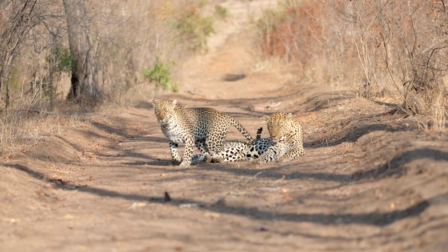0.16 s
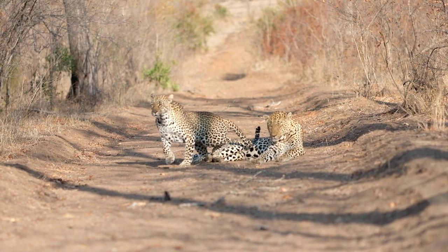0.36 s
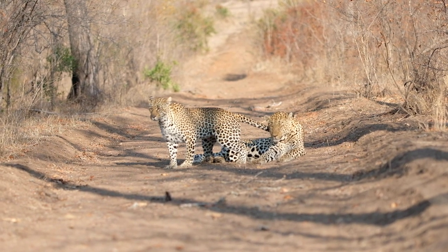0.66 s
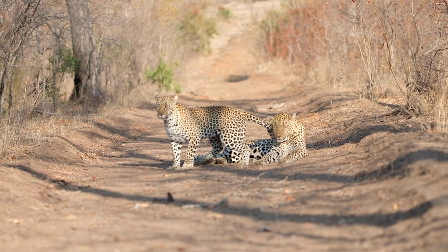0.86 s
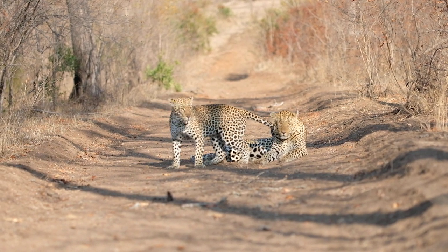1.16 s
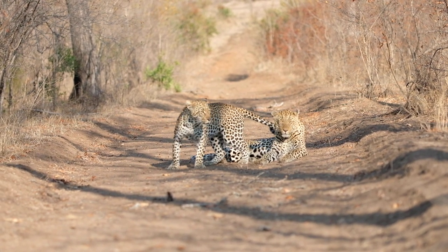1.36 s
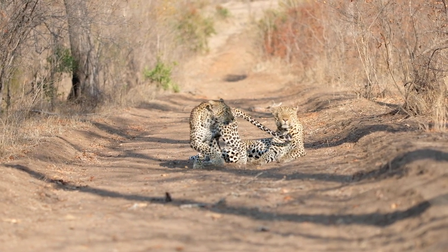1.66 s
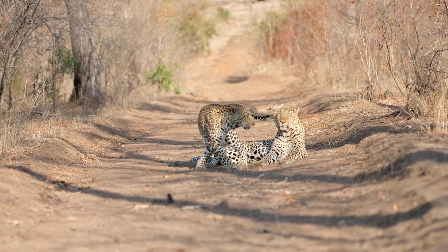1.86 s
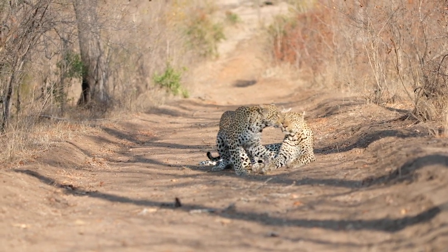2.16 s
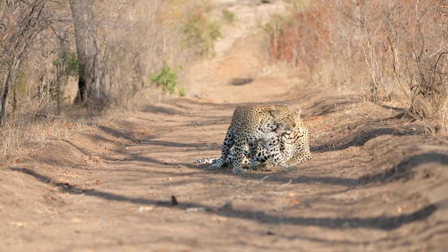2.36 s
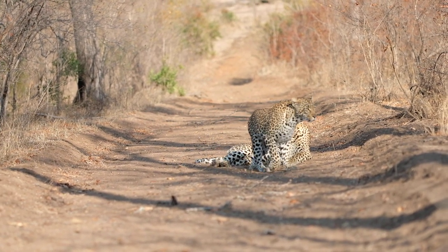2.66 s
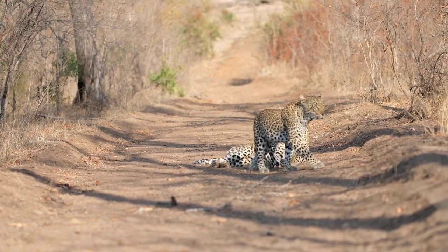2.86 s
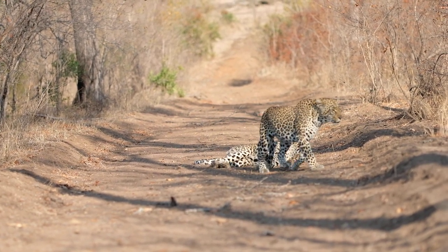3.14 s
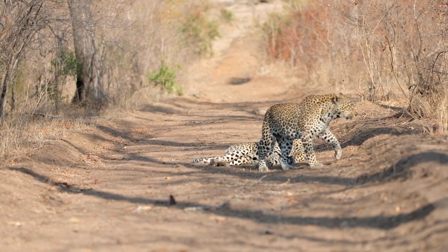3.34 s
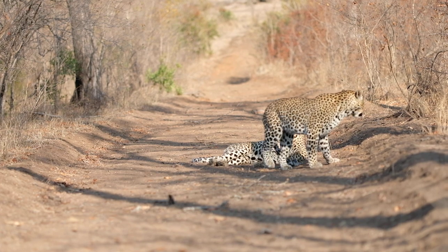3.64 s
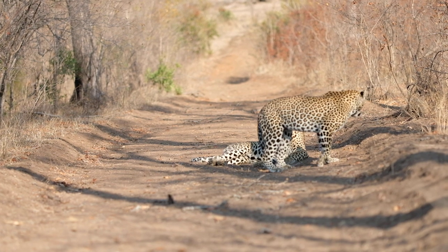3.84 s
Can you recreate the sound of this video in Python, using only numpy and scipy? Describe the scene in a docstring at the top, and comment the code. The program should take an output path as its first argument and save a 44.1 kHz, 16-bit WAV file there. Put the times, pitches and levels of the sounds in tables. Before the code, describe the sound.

Low pulsing leopard growl, a short grunt, then softer growling, with camera shutter bursts and wind

```python
"""A dirt track in dry bush: a leopard growls low in separate throat claps, grunts once, then growls softer.
Each clap is a push of air that rings the chest and throat and rasps in the mouth.
A camera beside the microphone fires two bursts of short rattles, and something hollow is knocked.
A far bird whistles faintly in gliding tones. Wind, made of shaped noise and short swings,
buffets the two microphone ports separately over a quiet hiss of open air."""
import sys
import numpy as np
from scipy import signal
from scipy.fft import rfft, irfft
from scipy.io import wavfile

SR = 44100
rng = np.random.default_rng(int(sys.argv[2]) if len(sys.argv) > 2 else 0)


def bounce(signal):
    """Save signal as a 16-bit WAV file at the path given by the first command-line argument."""
    frames = np.transpose(np.atleast_2d(signal))
    limited = np.clip(frames, -1, 1)
    pcm = np.round(limited * 32767).astype(np.int16)
    wavfile.write(sys.argv[1], SR, pcm)


N = 176400   # 4 s


def amp(db):
    """Turn decibels into a gain."""
    return 10 ** (np.asarray(db) / 20)


def unit(x):
    """Scale to an average strength (rms) of 1."""
    return x / np.sqrt(np.mean(x ** 2) + 1e-20)


def at_hz(points, hz):
    """Read a (frequency, value) table, spacing frequencies by ratio as the ear does."""
    f, v = np.transpose(points)
    return np.interp(np.log(hz + 1), np.log(f), v)


def coloured(points, channels):
    """Noise whose strength at each frequency follows a table, scaled to rms 1."""
    hz = np.arange(N // 2 + 1) * SR / N
    spectrum = rfft(rng.standard_normal((channels, N)))
    return unit(irfft(spectrum * amp(at_hz(points, hz)), N))


def drift(rate):
    """Slow random wandering with a spread of 1, from noise smoothed twice."""
    r = np.exp(-2 * np.pi * rate / SR)
    return unit(signal.lfilter([1], [1, -2 * r, r * r], rng.standard_normal(N + SR))[SR:])


def ring(x, hz, t60):
    """A struck body: a unit click starts a sine of height 1 that falls 60 dB in t60 seconds."""
    r, w = amp(-60 / (t60 * SR)), 2 * np.pi * hz / SR
    return signal.lfilter([0, np.sin(w)], [1, -2 * r * np.cos(w), r * r], x + 1e-18)


def resonance(x, hz, width_hz):
    """A hollow that favours one band of frequencies, with gain 1 at its peak."""
    r = np.exp(-np.pi * width_hz / SR)
    feedback = [1, -2 * r * np.cos(2 * np.pi * hz / SR), r * r]
    return signal.lfilter([(1 - r * r) / 2, 0, (r * r - 1) / 2], feedback, x + 1e-18)


def add(out, s, sound):
    """Mix a sound in at a time in seconds."""
    i = int(s * SR)
    part = sound[max(-i, 0):N - i]
    out[max(i, 0):max(i, 0) + len(part)] += part


# Chosen claps of each call: (time [s], level [dB], open-mouth rasp relative to the clap [dB]).
# The clap numbers count every clap; those between the chosen ones are evenly spaced.
GROWL = [(0.025, -27, -38), (0.122, -23.5, -42.5), (0.207, -24.5, -25), (0.29, -19.5, -34),
         (0.326, -21, -30), (0.364, -19, -32), (0.405, -23, -36.5), (0.501, -24, -36), (0.557, -21.5, -43),
         (0.646, -21, -47), (0.847, -25, -33), (0.984, -21.5, -41), (1.079, -21, -41), (1.185, -24.5, -42),
         (1.296, -29, -49)]
GROWL_CLAP_NUMBER = [0, 2, 4, 6, 7, 8, 9, 11, 12, 14, 18, 21, 23, 25, 27]
GRUNT = [(1.543, -39, -46), (1.557, -28.5, -25.5), (1.5812, -24, -28)]
GRUNT_CLAP_NUMBER = [0, 1, 2]
LOW_GROWL = [(1.946, -32.5, -43), (2.005, -40, -42), (2.062, -30.5, -60), (2.116, -38, -50),
             (2.167, -36.5, -41), (2.204, -33, -35), (2.265, -32.5, -58), (2.324, -30.5, -33.5),
             (2.383, -39, -44), (2.585, -32, -61), (2.687, -28.5, -61), (2.802, -36, -28)]
LOW_GROWL_CLAP_NUMBER = [0, 1, 2, 3, 4, 5, 6, 7, 8, 12, 14, 16]
# Chest in each call: (pitch [Hz], time to fall 60 dB [s], extra throat level [dB])
GROWL_CHEST, GRUNT_CHEST, LOW_GROWL_CHEST = (205, 0.053, 0), (216.5, 0.051, 0), (187, 0.076, -1.2)
# Ringing of the throat: (frequency [Hz], relative level [dB], time to fall 60 dB [s])
THROAT = [(257, -10.5, 0.052), (344, -14.5, 0.076)]
# Ringing of the mouth: (frequency [Hz], relative level [dB], time to fall 60 dB [s])
MOUTH = [(1600, -3, 0.024), (1963, 0.5, 0.04), (2260, 0, 0.03), (2730, -10, 0.034), (3300, -11, 0.022)]
CLAP_S, RASP_S, BREATH_S = 0.0034, 0.0059, 0.05   # push length; fading times of rasp and breath
BREATH_DB, CHEST_WIDTH_HZ = -70, 570
CHEST_SPREAD, MOUTH_SPREAD = .012, .025   # chance in pitch from clap to clap, as a fraction
CLAP_SPREAD_DB = 1.5
HOLD_DB = 26.5   # added to the rasp level to set the later pushes, up to full strength


def growl(rows, numbers, chest):
    """Each clap of the vocal folds is a soft push that rings chest and throat and rasps in the mouth."""
    s, level_db, rasp_db = np.transpose(rows)
    chest_hz, chest_t60, throat_db = chest
    out = np.zeros(N)
    t = np.arange(SR // 8) / SR
    push = np.hanning(max(int(CLAP_S * SR), 3)) / (CLAP_S * SR / 2)
    push = np.pad(push, (0, len(t) - len(push)))
    for k in range(numbers[-1] + 1):
        hz = chest_hz * (1 + CHEST_SPREAD * rng.standard_normal())
        puff = rng.standard_normal(len(t))
        open_db = np.interp(k, numbers, rasp_db)
        # with the mouth open the folds push again one and two chest cycles later
        again = np.roll(push, int(SR / hz)) + np.roll(push, int(2 * SR / hz))
        hold = min(amp(HOLD_DB + open_db), 1) * again
        throat_drive = push + amp(BREATH_DB) * puff * np.exp(-t / BREATH_S)
        body = resonance(ring(throat_drive + hold, hz, chest_t60), chest_hz, CHEST_WIDTH_HZ)
        for f, db, t60 in THROAT:
            body = body + amp(throat_db + db) * ring(throat_drive, f, t60)
        rasp = np.zeros(len(t))
        for f, db, t60 in MOUTH:
            mouth_hz = f * (1 + MOUTH_SPREAD * rng.standard_normal())
            rasp += amp(db - 23) * ring(puff * np.exp(-t / RASP_S), mouth_hz, t60)
        gain = amp(np.interp(k, numbers, level_db) + CLAP_SPREAD_DB * rng.standard_normal())
        add(out, np.interp(k, numbers, s), -gain * (body + amp(open_db) * rasp))
    return out


# Camera bursts: (time of the first clack [s], number of frames)
BURSTS = [(.8648, 3), (1.7865, 4)]
# Moving parts touching: (time into the frame [s], relative level [dB], relative treble level [dB],
# mirror box level against the first [dB], rise [s], fall [s]); the first row only opens a burst
CONTACTS = [(0, -40, -6.5, 2.5, 0.0015, 0.0048), (0.028, -45.5, -3.5, -2, 0.0069, 0.0091),
            (0.0498, -45, -4, 4, 0.0014, 0.0054), (0.0719, -37, 1, 3.5, .0008, .004),
            (0.0869, -37, 1, -2.5, 0.00411, 0.0042)]
# Camera body: (frequency [Hz], half width [Hz], relative level [dB])
CAMERA = [(1000, 43, -5.5), (1815, 80, 6.5), (2000, 170, 0.5), (3630, 104, -8), (5580, 570, -19.5),
          (7400, 290, -17.5)]
# Mirror box: (frequency [Hz], half width [Hz], relative level [dB])
MIRROR = [(826, 77, 2), (1418, 55, 2), (2170, 236, -4.5), (2810, 87, -11.5)]
# The mirror hitting its stop: (frequency [Hz], relative level [dB], rise and fall [s])
THUD = [(395, -5, 0.0021), (1005, -7.5, 0.0044), (1797, 5.5, 0.0017)]
THUD_CONTACTS = (0, 4)   # rows of CONTACTS that thud
FRAME_S, LAST_EARLY_S = .0895, .0045   # the last contact of a burst comes early
BOUNCE_S, BOUNCE_DB = 0.0077, -14.5   # every contact touches again
MOTOR_TICKS_PER_S = 1600
MOTOR_BODY_DB, MOTOR_BOX_DB, MOTOR_TREBLE_DB = -62, -58.5, -58
CAMERA_PAN_DB, CAMERA_LAG_S = 2.5, 0.000095   # left is louder, right is later
CAMERA_TREBLE_HZ, CAMERA_HISS_DB = 3000, -13
TREBLE_ALIKE = 0.12   # left-right likeness, 0 to 1
CAMERA_ECHO_DB, CAMERA_ECHO_S = -11, 0.0098


def camera_resonances(x_of_hz, table, gain_db):
    """Parts of a casing resonate side by side, every second one pushing the opposite way."""
    total = 0
    for k, (hz, half_width, db) in enumerate(table):
        total = total + (-1) ** k * amp(db + gain_db) * resonance(x_of_hz(hz), hz, 2 * half_width)
    return total


def camera():
    """Mirror and shutter contacts rattle the body briefly; a motor ticks throughout each burst."""
    drive, box, bright, thud = np.zeros((4, N))
    t = np.arange(SR // 20) / SR
    stop = sum(amp(db + 8) * t / d * np.exp(-t / d) * np.sin(2 * np.pi * hz * t) for hz, db, d in THUD)
    for start, frames in BURSTS:
        hits = [(start, 0)]
        for frame in range(frames):
            hits += [(start + frame * FRAME_S, row) for row in range(1, len(CONTACTS))]
        for k, (frame_start, row) in enumerate(hits):
            offset, db, treble_db, box_db, rise, fall = CONTACTS[row]
            s = frame_start + offset - LAST_EARLY_S * (k == len(hits) - 1)
            shape = amp(db) * np.minimum(t / rise, np.exp((rise - t) / fall))
            shape = shape + amp(BOUNCE_DB) * np.roll(shape, int(BOUNCE_S * SR))
            # random signs turn each smooth shape into a rattle
            add(drive, s, shape * rng.choice([-1, 1], len(t)))
            add(box, s, amp(box_db) * shape * rng.choice([-1, 1], len(t)))
            add(bright, s, shape ** 2 / amp(db) * amp(treble_db))
            if row in THUD_CONTACTS:
                add(thud, s + rise / 2, amp(db) * stop)
        size = int(frames * FRAME_S * SR)
        ticks = (rng.random(size) < MOTOR_TICKS_PER_S / SR) * rng.standard_normal(size)
        ticks = ticks * np.sqrt(SR / MOTOR_TICKS_PER_S)
        add(drive, start, amp(MOTOR_BODY_DB) * ticks)
        add(box, start, amp(MOTOR_BOX_DB) * ticks)
        add(bright, start, amp(MOTOR_TREBLE_DB) * ticks)

    # the treble is noise, mostly different on each side
    shared, *own = rng.standard_normal((3, N))
    bright = bright * (np.sqrt(TREBLE_ALIKE) * shared + np.sqrt(1 - TREBLE_ALIKE) * np.array(own))
    late = np.arange(N) - CAMERA_LAG_S * SR
    pan = amp([[CAMERA_PAN_DB / 2], [-CAMERA_PAN_DB / 2]])
    drive, box, thud = (pan * [x, np.interp(late, np.arange(N), x)] for x in (drive, box, thud))

    body = camera_resonances(lambda hz: drive if hz < CAMERA_TREBLE_HZ else bright, CAMERA, 13.5)
    mirror = camera_resonances(lambda hz: box, MIRROR, 11)
    hiss = amp(CAMERA_HISS_DB) * resonance(resonance(bright, 7400, 8000), 7600, 7000)
    sound = body + thud + hiss + mirror
    tail = rng.standard_normal((2, len(t))) * np.exp(-t / CAMERA_ECHO_S)
    tail = tail / np.sqrt(CAMERA_ECHO_S * SR / 2)
    return sound + amp(CAMERA_ECHO_DB) * signal.fftconvolve(sound, tail, axes=1)[:, :N]


# Ringing of the knocked thing: (frequency [Hz], relative level [dB], time to fall 60 dB [s])
KNOCK = [(542, -11, 0.11), (710, 9.5, 0.11), (1293, 6.5, 0.039), (1980, 0.5, 0.022), (2360, -15, 0.032),
         (4200, -11.5, 0.014), (6300, -25, 0.019)]
KNOCK_S, KNOCK_DB = .6855, -41.5


def knock():
    """A quick triple tap sets something hollow ringing at several pitches."""
    taps = np.zeros(N)
    for delay, height in [(0, 1), (.0015, -.8), (.006, .4)]:
        taps[int((KNOCK_S + delay) * SR)] = height
    return sum(amp(KNOCK_DB + db) * ring(taps, hz, t60) for hz, db, t60 in KNOCK)


# Far bird notes: (time [s], length [s], start pitch [Hz], end pitch [Hz], level before shaping [dB])
BIRD = [(2.69, 0.054, 3060, 2920, -72), (3.166, 0.017, 3340, 3480, -67), (3.199, 0.019, 3420, 3300, -64.5),
        (3.25, 0.14, 2900, 2840, -68.5)]


def bird():
    """Each thin whistle is a sine that glides in pitch and swells towards its end."""
    out = np.zeros(N)
    for s, length, from_hz, to_hz, db in BIRD:
        size = int(length * SR)
        shape = np.hanning(size) ** .25 * np.linspace(.4, 1, size)
        turns = np.cumsum(np.linspace(from_hz, to_hz, size)) / SR
        add(out, s, amp(db) * shape * np.sin(2 * np.pi * turns))
    return out


BUFFET_CYCLES, SWING_SPREAD = 0.36, .7   # half-length in cycles; chance in phase [radians]
FLUTTER_DB, FLUTTER_CYCLES = -14.5, 1.79
EDGE_PITCH, EDGE_CYCLES = 1.86, 0.43   # pitch as a multiple of the buffet's
EDGE_DB, EDGE_FOLLOWS = -2, 0.98   # the edge gains this many extra dB for each dB of buffet
SNAP_DB, SNAP_HZ = -26.5, 1000   # a sharp click whose dB grow twice as fast as the buffet's


def buffets(rows):
    """Each eddy is a short pressure swing with flutter around it; strong ones have a quick edge and snap."""
    out = np.zeros(N)
    t = np.arange(-SR // 10, SR // 10) / SR
    for s, db, hz in rows:
        phase = np.pi / 2 + rng.normal(0, SWING_SPREAD, 2)
        edge_hz = hz * EDGE_PITCH
        swing = np.exp(-.5 * (t * hz / BUFFET_CYCLES) ** 2) * np.cos(2 * np.pi * hz * t + phase[0])
        edge = np.exp(-.5 * (t * edge_hz / EDGE_CYCLES) ** 2) * np.cos(2 * np.pi * edge_hz * t + phase[1])
        band = signal.butter(3, [hz / 2, hz * 1.55], "band", fs=SR, output="sos")
        noise = signal.sosfilt(band, rng.standard_normal(len(t)))
        flutter = unit(noise) * np.exp(-.5 * (t * hz / FLUTTER_CYCLES) ** 2)
        snap = -np.sign(t) * np.exp(-np.abs(t) * 2 * np.pi * SNAP_HZ)
        eddy = swing + amp(FLUTTER_DB) * flutter
        eddy = eddy + amp(EDGE_DB + EDGE_FOLLOWS * db) * edge + amp(SNAP_DB + db) * snap
        add(out, s + t[0], amp(db) * eddy)
    return out


# Rumble on the microphone ports: (time [s], left level [dB], right level [dB])
WIND = [(0, -40.5, -45), (0.2, -63, -42.5), (0.401, -40.5, -33.5), (.6, -54, -41), (1.0, -49.5, -39),
        (1.3, -53, -62.5), (1.5, -53.5, -43), (1.7, -59.5, -55.5), (1.95, -53.5, -55), (2.3, -53.5, -52),
        (2.5, -57, -44), (2.75, -47.5, -45.5), (2.95, -43.5, -40), (3.2, -37, -51.5), (3.29, -51, -45),
        (3.45, -35.5, -57), (3.62, -48.5, -42.5), (3.781, -32, -43.5), (4, -27, -40)]
# Tone of the rumble: (frequency [Hz], relative level per Hz [dB])
WIND_COLOUR = [(20, -42.5), (35, 7), (70, 18), (120, 10), (200, -1.5), (350, -12.5), (600, -62.5)]
# Tone of the brighter, gusty part: (frequency [Hz], relative level per Hz [dB])
GUSTY_COLOUR = [(60, -3.5), (120, 9.5), (200, 14), (350, -6), (600, -21), (1000, -112)]
# Buffets on each port: (time [s], swing level [dB], pitch [Hz])
LEFT_BUFFETS = [(0.28, -22.5, 88), (0.375, -23.5, 106), (1.285, -21, 118), (2.472, -26, 78),
                (2.775, -25, 86.5), (2.841, -22, 151), (2.895, -9, 144), (2.926, -12.5, 143),
                (2.948, -15.5, 178), (3.005, -21.5, 115), (3.075, -16, 101.5), (3.143, -19, 126),
                (3.203, -13.5, 118), (3.242, -15.5, 98), (3.392, -23.5, 90), (3.426, -19, 125),
                (3.455, -22.5, 160), (3.473, -22, 260), (3.518, -10, 183), (3.553, -17.5, 129),
                (3.574, -21, 111), (3.675, -15, 140), (3.692, -23.5, 147), (3.699, -7, 222),
                (3.732, -19, 114.5), (3.763, -10, 162), (3.78, -7, 227), (3.815, -10.5, 203),
                (3.847, -25.5, 114), (3.876, -13.5, 168), (3.911, -17, 173), (3.95, -6.5, 257),
                (3.971, -15, 188), (3.9935, -9, 220)]
RIGHT_BUFFETS = [(0.376, -25, 97), (0.422, -28, 103), (0.453, -18, 106.5), (0.494, -28, 82.5),
                 (0.542, -17, 98), (0.761, -19.5, 106), (0.843, -28, 108.8), (0.895, -21, 126),
                 (2.461, -23, 81), (2.89, -21, 118), (2.96, -20, 144), (3.305, -24.5, 145),
                 (3.684, -29, 97), (3.711, -24.5, 181), (3.905, -24, 83)]
WIND_LUMPY_DB, WIND_LUMPS_PER_S = 3, 26
# The brighter part grows faster than the rumble: it is GUSTY_DB against it when that is at GUSTY_FROM_DB
GUSTY_DB, GUSTY_FOLLOWS, GUSTY_FROM_DB = -8, 0.77, -45.5


def wind():
    """Moving air makes a lumpy rumble, its own on each port, under the buffets."""
    s, *sides = np.transpose(WIND)
    time = np.arange(N) / SR
    level = np.array([np.interp(time, s, db) + WIND_LUMPY_DB * drift(WIND_LUMPS_PER_S) for db in sides])
    gusty_gain = amp(GUSTY_DB + GUSTY_FOLLOWS * (level - GUSTY_FROM_DB))
    gusty = gusty_gain * coloured(GUSTY_COLOUR, channels=2)
    rumble = coloured(WIND_COLOUR, channels=2)
    return amp(level) * (rumble + gusty) + [buffets(LEFT_BUFFETS), buffets(RIGHT_BUFFETS)]


# Tone of the open air: (frequency [Hz], relative level per Hz [dB])
AIR = [(20, -52), (200, -3.5), (320, -9.5), (600, -12), (1100, -17), (2000, -23), (3500, -30.5),
       (6000, -35.5), (10000, -40.5), (13000, -45), (15500, -46)]
# Left-right likeness of the air: (frequency [Hz], likeness [0 to 1])
AIR_ALIKE = [(200, 0.41), (500, 0.44), (1000, .06), (8000, .05)]


def air():
    """Smooth far hiss: noise partly alike in both ears in the bass, nearly separate above."""
    mid, side = rfft(coloured(AIR, channels=2))
    alike = np.clip(at_hz(AIR_ALIKE, np.arange(len(mid)) * SR / N), 0, 1)
    both = np.sqrt(1 + alike) * mid + np.sqrt(1 - alike) * side * [[1], [-1]]
    return amp(-58.5) * irfft(both, N)


def scene():
    """Cat, knock and bird in the middle, camera a little to the left, wind and air on both sides."""
    cat = growl(GROWL, GROWL_CLAP_NUMBER, GROWL_CHEST)
    cat = cat + growl(GRUNT, GRUNT_CLAP_NUMBER, GRUNT_CHEST)
    cat = cat + growl(LOW_GROWL, LOW_GROWL_CLAP_NUMBER, LOW_GROWL_CHEST)
    return cat + camera() + knock() + bird() + wind() + air()


def record(dry):
    """A steep filter cuts the top above 15.6 kHz."""
    return signal.sosfilt(signal.ellip(12, .5, 70, 15600, fs=SR, output="sos"), dry)


dry = scene()
out = record(dry)
bounce(out)
```